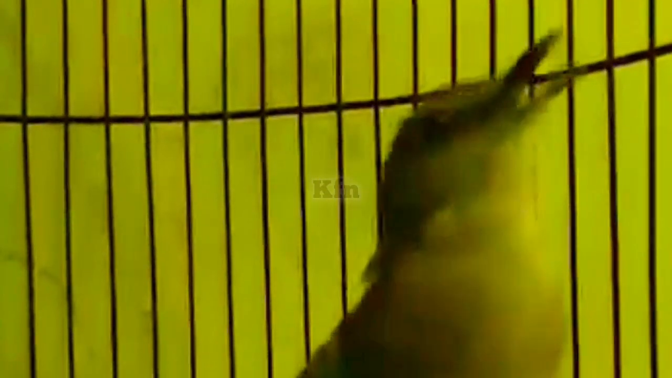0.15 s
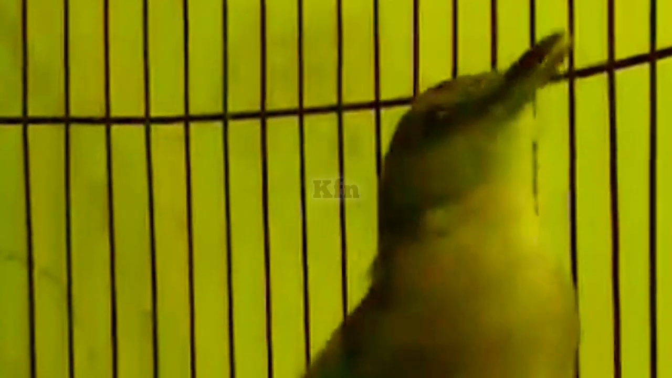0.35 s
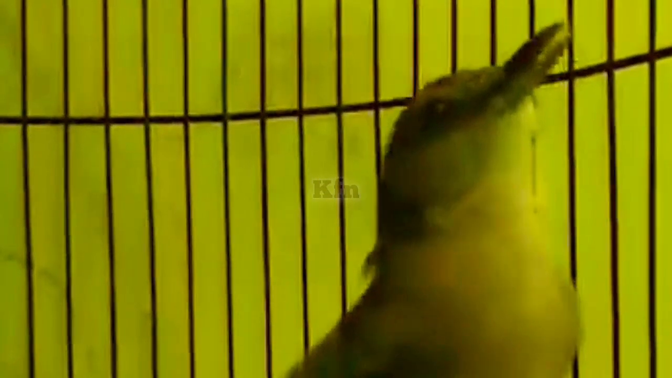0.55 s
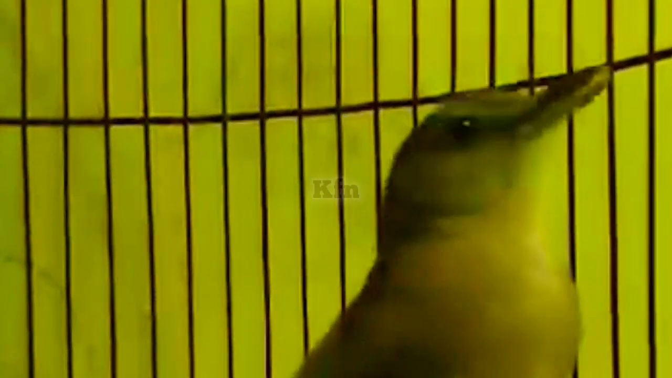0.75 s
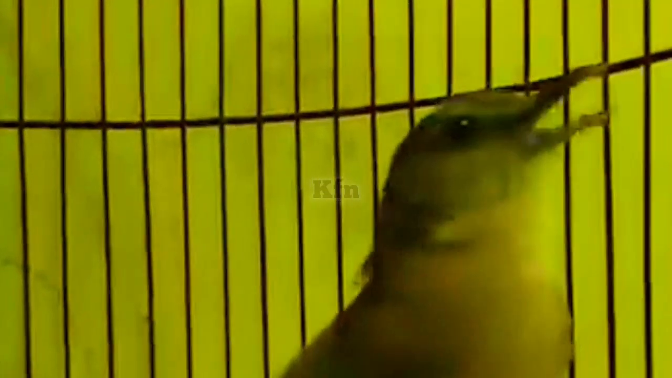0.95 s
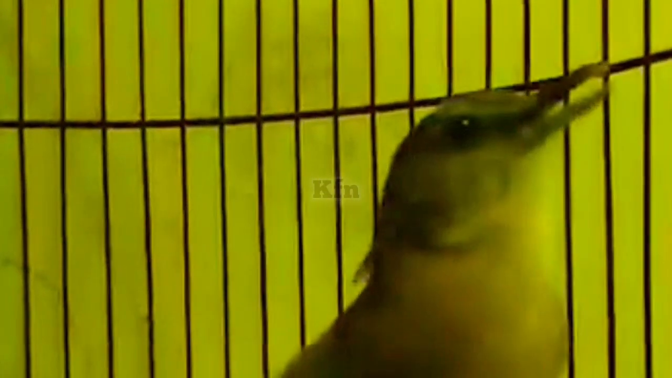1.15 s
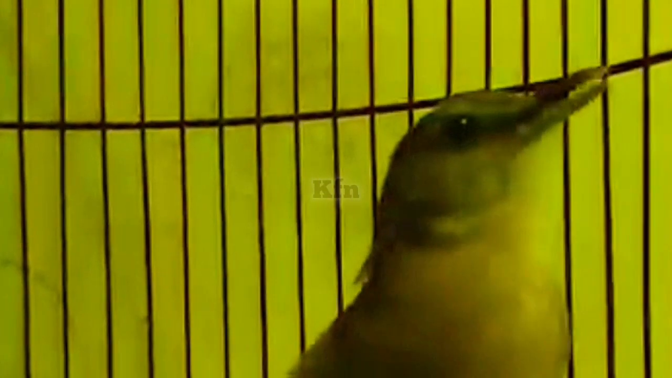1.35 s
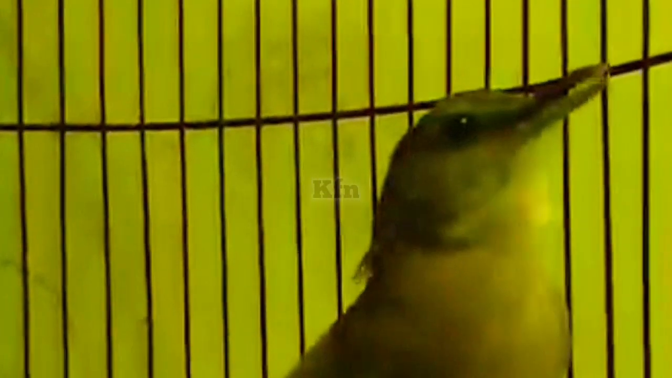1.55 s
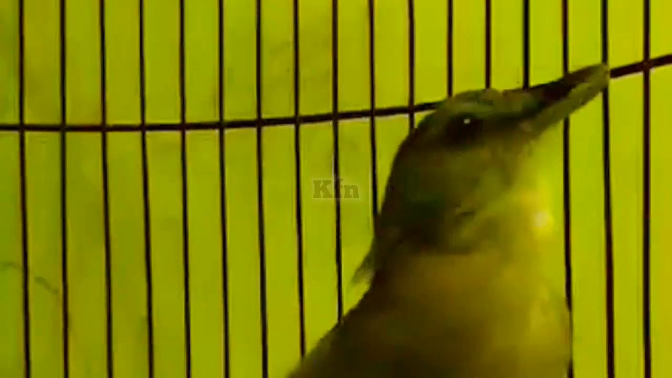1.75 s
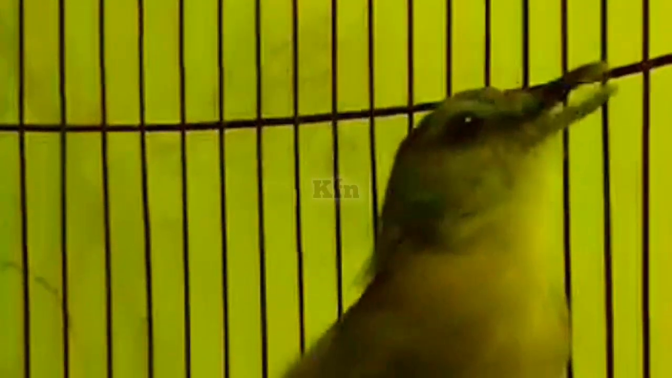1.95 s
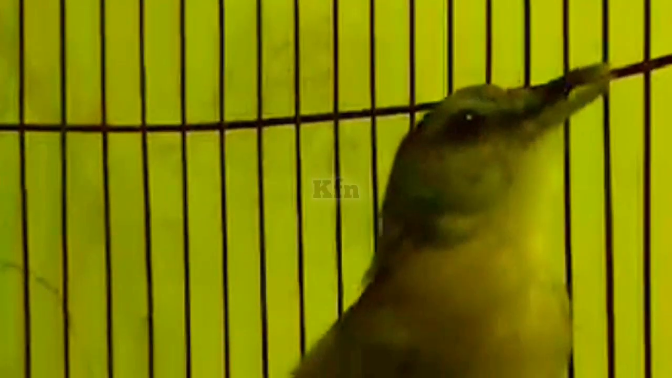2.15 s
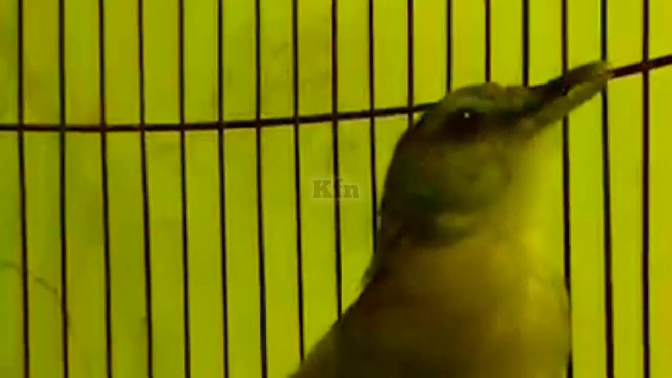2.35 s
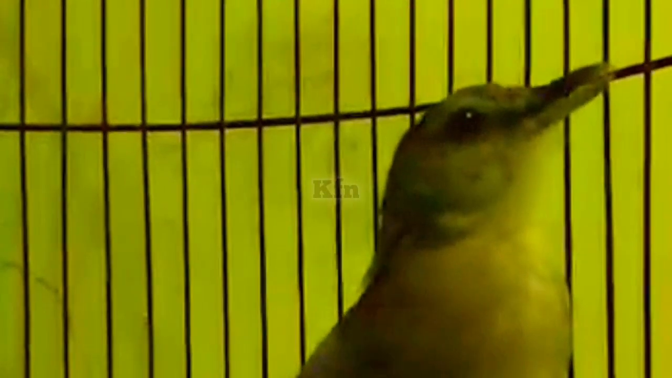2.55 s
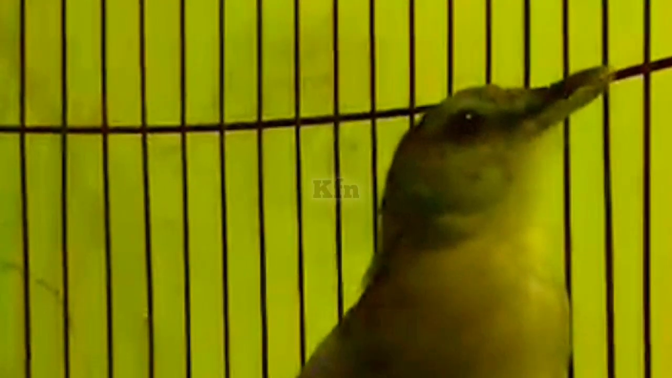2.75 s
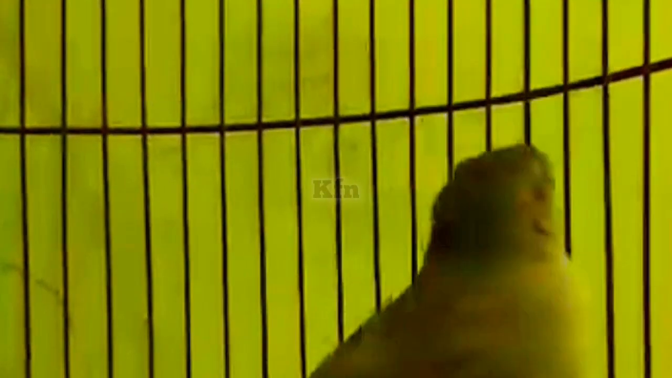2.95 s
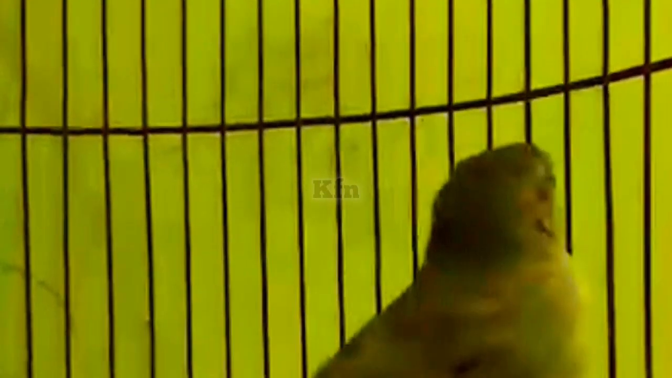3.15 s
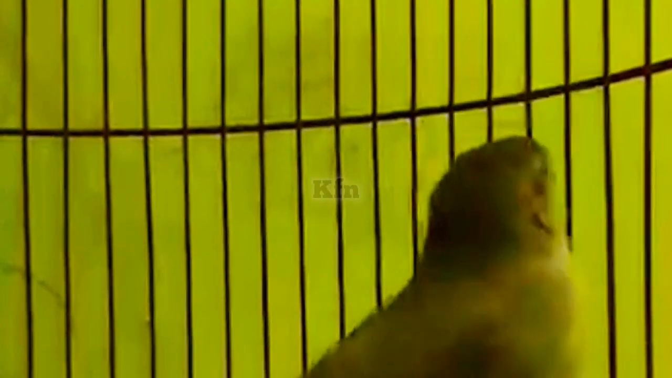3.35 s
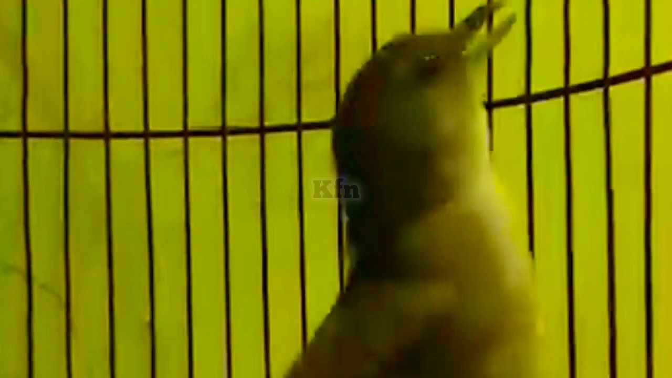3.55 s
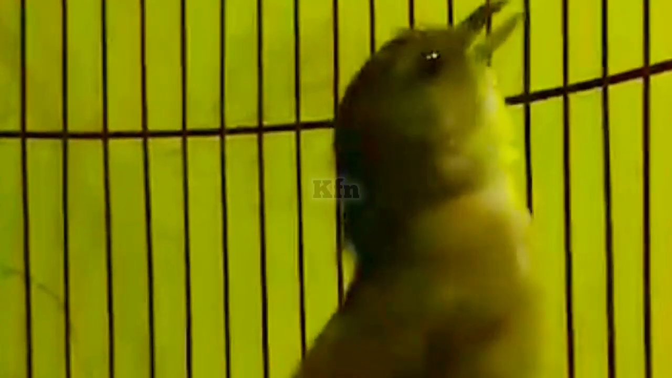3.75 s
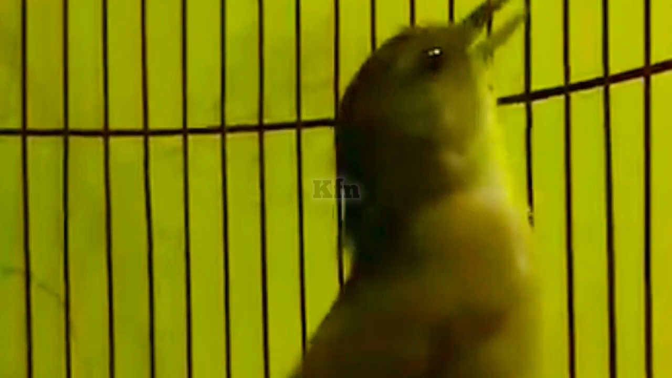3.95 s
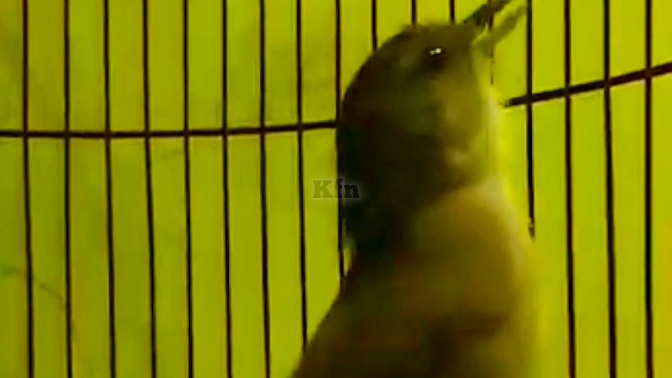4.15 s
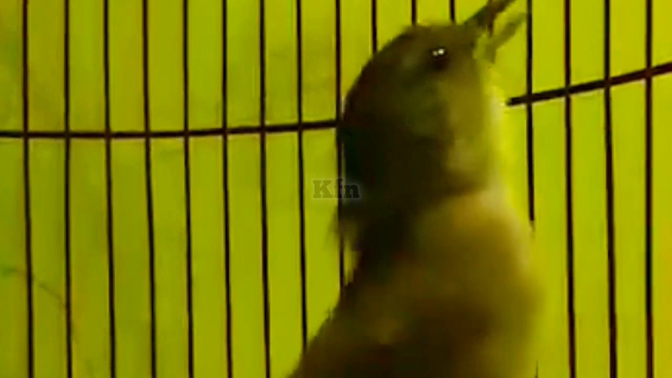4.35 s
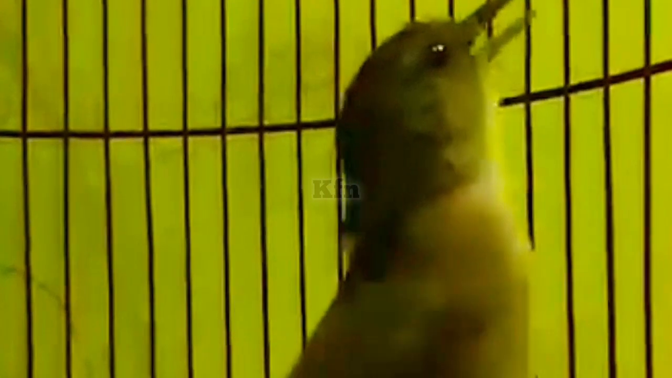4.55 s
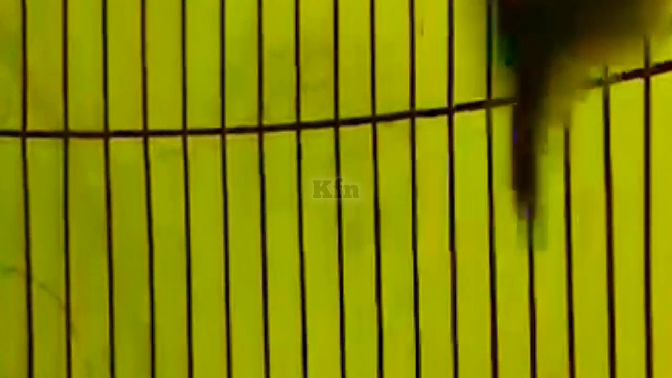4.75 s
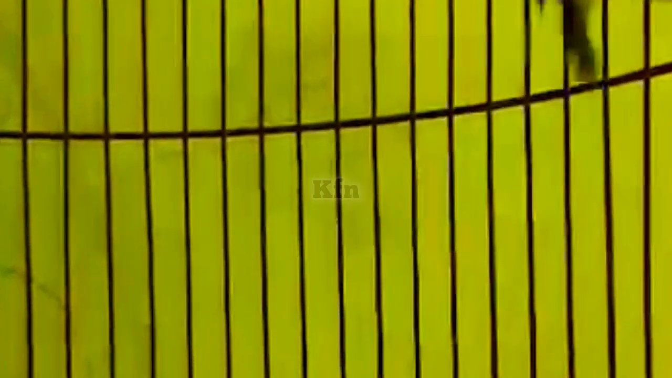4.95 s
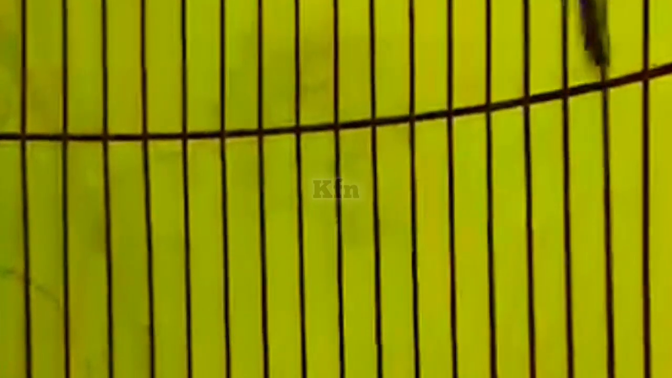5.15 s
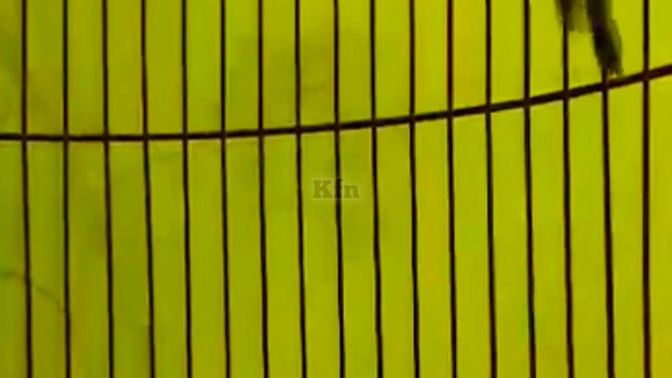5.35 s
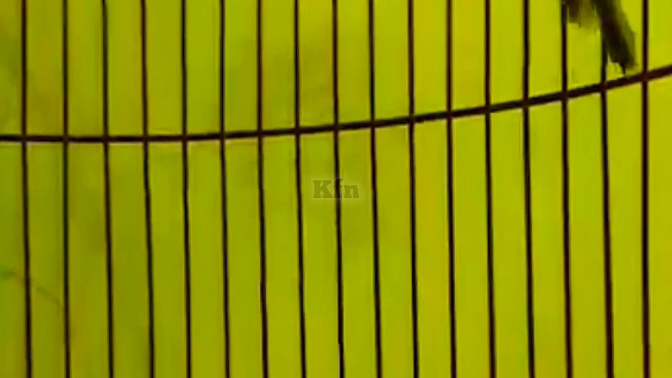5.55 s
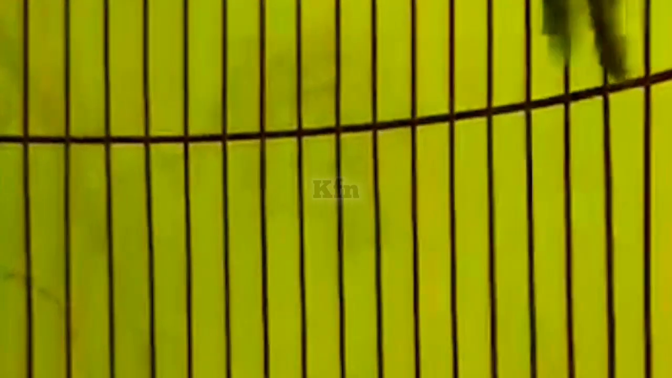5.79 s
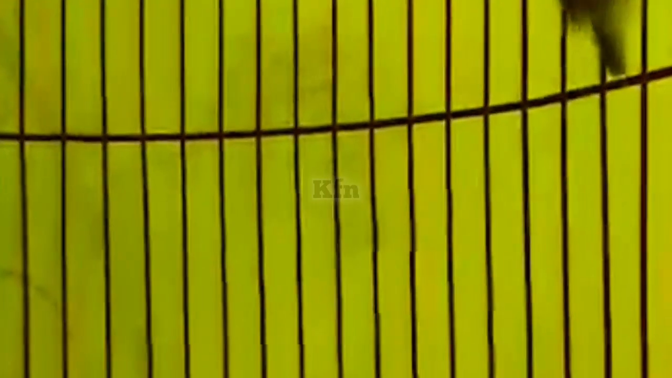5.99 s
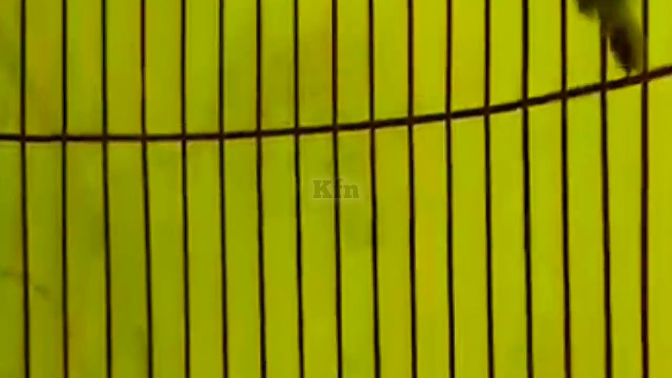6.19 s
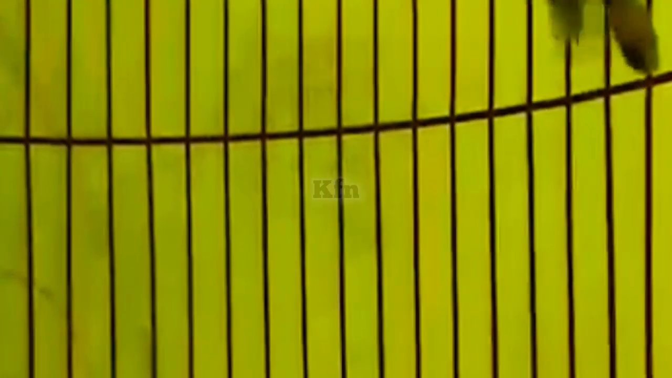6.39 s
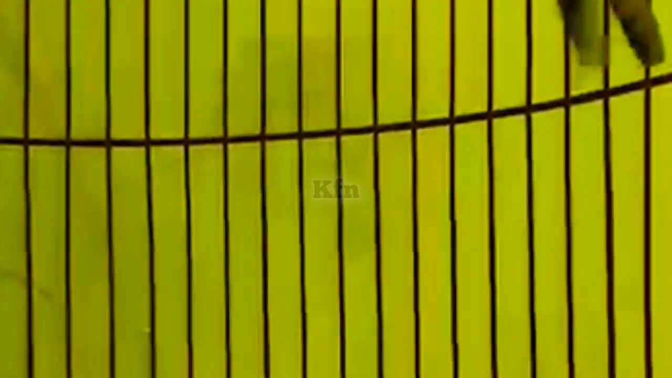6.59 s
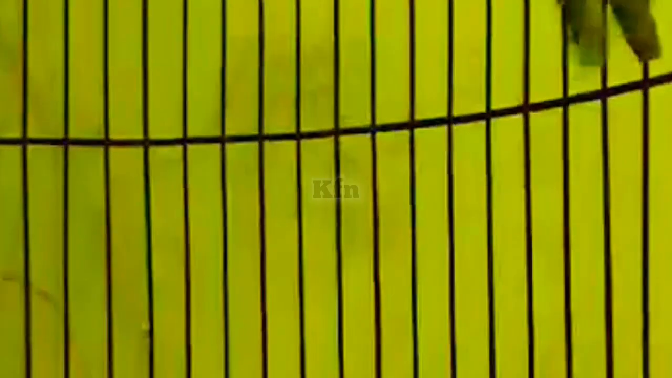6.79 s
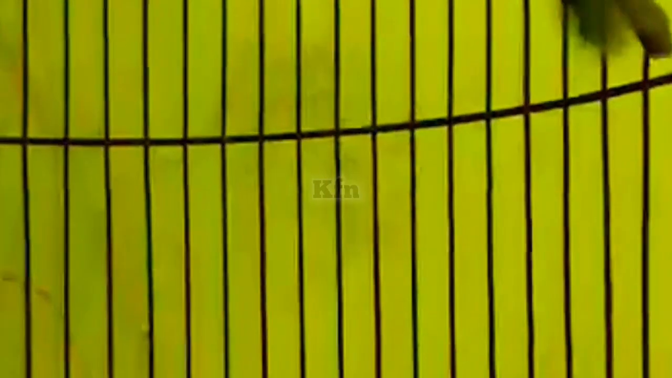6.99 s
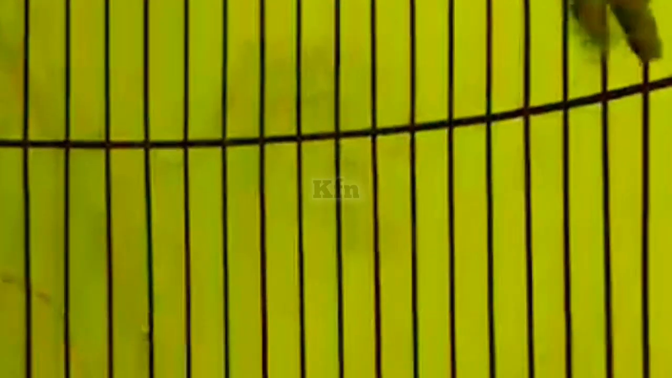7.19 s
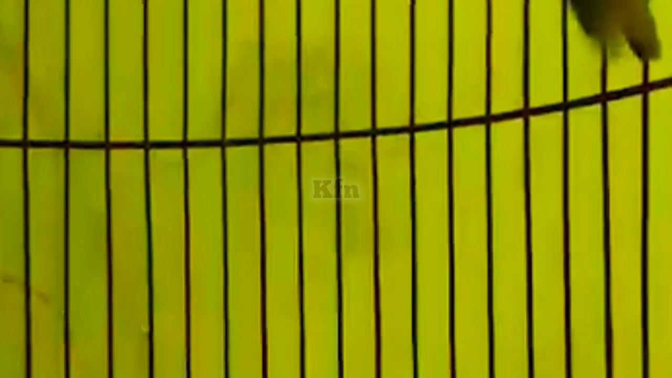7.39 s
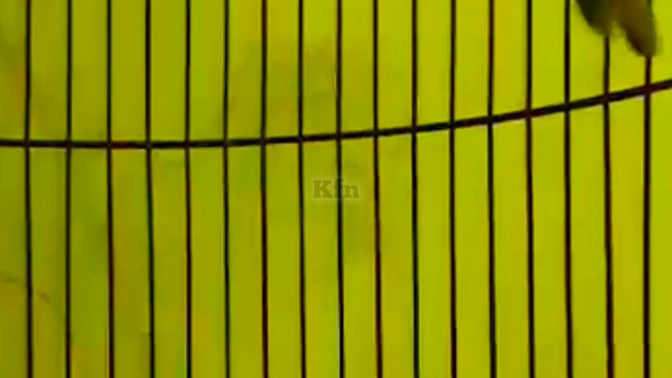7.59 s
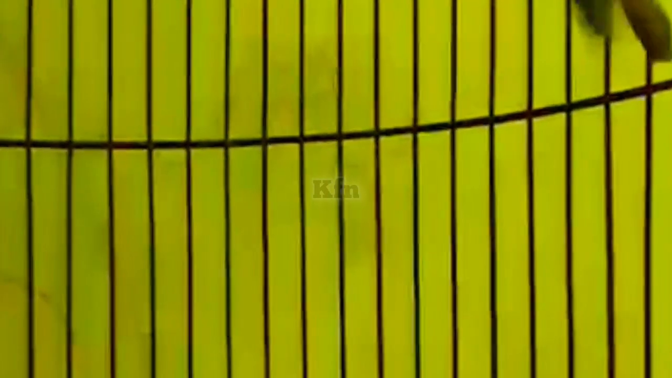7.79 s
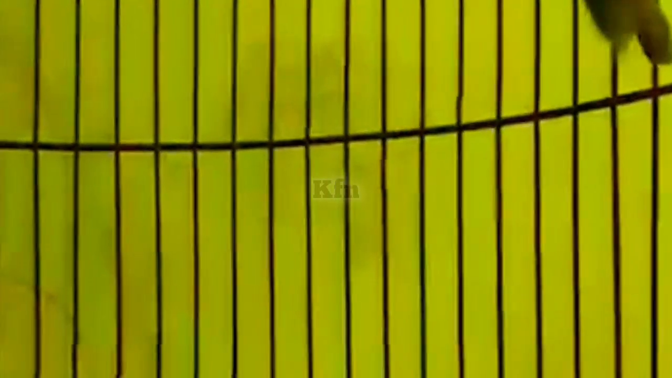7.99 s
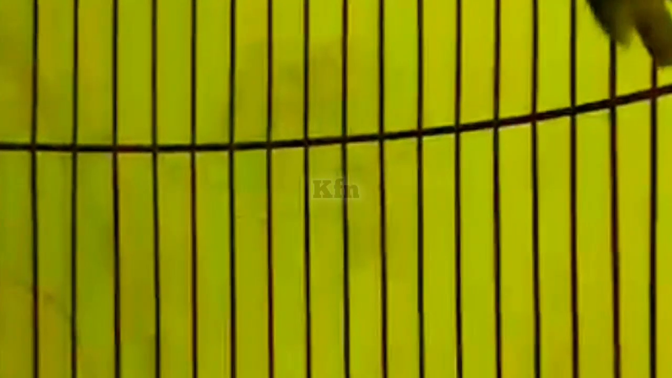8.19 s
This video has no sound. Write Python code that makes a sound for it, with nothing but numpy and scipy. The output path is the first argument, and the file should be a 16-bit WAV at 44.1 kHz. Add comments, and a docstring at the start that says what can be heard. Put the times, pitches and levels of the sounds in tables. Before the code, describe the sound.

A songbird in a wire cage whistles very close to the microphone: separate, nearly pure notes that scoop upward, waver high or swoop down, each trailing a short dense echo. Pauses between them hold soft chirps from a second bird further off. Just before five seconds it hops, scuffing and knocking the perch and making wires ring, then sings on. Faint room noise and low hum lie underneath.

```python
"""A babbler whistles loud, slurred notes in a wire cage, close to the microphone in a small hard-walled room:
nearly pure gliding tones with weak overtones and a rush of air, each hanging on as dense echoes.
Midway it hops to a higher perch: noise scuffs, and decaying modes ring in the wires and the perch.
A second bird answers softly from further off with sliding chirps that arrive largely as echo.
Behind them lie coloured room noise, a faint low hum and a rumble that follows the song."""
import sys
import numpy as np
from scipy import signal
from scipy.fft import rfft, irfft, next_fast_len
from scipy.io import wavfile
from scipy.ndimage import uniform_filter1d, minimum_filter1d, map_coordinates

SR = 44100
rng = np.random.default_rng(int(sys.argv[2]) if len(sys.argv) > 2 else 0)


def dump(signal):
    """Clip the signal to [-1, 1] and save it as 16-bit WAV at the path in sys.argv[1]."""
    limited = np.clip(np.atleast_2d(signal).T, -1, 1)
    pcm = np.round(limited * 32767).astype(np.int16)
    wavfile.write(sys.argv[1], SR, pcm)


N = 362943
T = np.arange(N) / SR


def babbler(direct_db=0, room_db=-4.0):
    """Close by, each note comes straight from the beak and hangs on in the room."""
    out = np.zeros(N)
    for sing, rows in (upslur, UPSLURS), (warble, WARBLES), (swoop, SWOOPS), (chip, CHIPS):
        for s, length, *shape in rows:
            note = sing(np.arange(0, length, 1 / SR), *shape)
            add(out, s, amp(direct_db) * note)
            add(out, s, amp(room_db) * room(note))
    return out


# whistles that sag, then climb; the first is already under way at the start:
# [start t/s, length t/s, end of sag t/s, first f/Hz before the flick, dip f/Hz, top f/Hz before the release,
#  bow of the climb, first effort/dB, last effort/dB, overtone tilt/dB per octave]
UPSLURS = [(-.06, 0.25, 0.054, 1936, 1862, 2809, .3, -8, -5.5, 5.5),
           (1.581, .403, .215, 2108, 1701, 2300, 1.91, -9, -8.5, 2.5),
           (4.222, .328, .15, 2055, 1916, 2566, 0.37, -7.5, -8, 2),
           (6.118, 0.31, 0.073, 2022, 1940, 2671, -0.67, -8, -10, 6.5)]


def upslur(t, sag_s, first_hz, dip_hz, top_hz, bow, first_db, last_db, tilt_db, ease_db=3):
    """Flicks up, sags, then climbs to its top; the bird eases off in the middle."""
    sag = (dip_hz - first_hz) * slide(t, FLICK_S, sag_s, bow=.6)
    climb = (top_hz - dip_hz) * slide(t, sag_s, t[-1] - RELEASE_S, bow)
    pitch = (first_hz + sag + climb) * flick(t, depth=.14)
    u = t / t[-1]
    effort_db = first_db + (last_db - first_db) * u - ease_db * np.sin(np.pi * u) ** 2
    return whistle(t, pitch, effort_db, tilt_db)


# high whistles that dip, move to a crest, sink to a trough and lift again:
# [start t/s, length t/s, first f/Hz, dip f/Hz, crest f/Hz, trough f/Hz, last f/Hz before the release,
#  first effort/dB, last effort/dB, overtone tilt/dB per octave]
WARBLES = [(0.95, 0.26, 2855, 2720, 3100, 2305, 2415, -4.5, -9.5, 1),
           (3.681, 0.25, 2698, 2587, 3063, 2392, 2487, -6, -7.5, -2.5),
           (5.573, .241, 3094, 2764, 2920, 2388, 2576, -2.5, -6.5, 0.5),
           (6.897, 0.21, 3083, 2597, 2588, 2221, 2362, -13, -9.5, -8)]
DIP_S, CREST_S, TROUGH_S = .045, .079, .168  # when a warble reaches each, from its start


def warble(t, first_hz, dip_hz, crest_hz, trough_hz, last_hz, first_db, last_db, tilt_db, ease_db=6):
    """Dips, moves to a crest, sinks to a trough while the push slackens, and lifts again."""
    dip = (dip_hz - first_hz) * slide(t, 0, DIP_S, bow=0.55)
    crest = (crest_hz - dip_hz) * slide(t, DIP_S, CREST_S, bow=.6)
    trough = (trough_hz - crest_hz) * slide(t, CREST_S, TROUGH_S, bow=.65)
    lift = (last_hz - trough_hz) * slide(t, TROUGH_S, t[-1] - RELEASE_S)
    slack = np.sin(np.pi * slide(t, CREST_S, t[-1], bow=0.36)) ** 2
    effort_db = first_db + (last_db - first_db) * t / t[-1] - ease_db * slack
    return whistle(t, first_hz + dip + crest + trough + lift, effort_db, tilt_db)


# whistles that swoop down:
# [start t/s, length t/s, top f/Hz, f/Hz the fall heads for, effort/dB, overtone tilt/dB per octave]
SWOOPS = [(0.492, 0.1063, 2285, 1624, -12.5, 1), (5.223, 0.13, 2278, 1396, -12, -1),
          (7.794, 0.13, 2240, 1549, -17, -11.5)]
SWOOP_S = .09  # time a swoop takes to fall


def swoop(t, top_hz, last_hz, db, tilt_db, depth=0.1, swell_db=7):
    """Flicks up as it swells, then falls in an S-curve."""
    fall = np.sin(np.pi / 2 * slide(t, FLICK_S, FLICK_S + SWOOP_S)) ** 2
    pitch = (top_hz + (last_hz - top_hz) * fall) * flick(t, depth)
    effort_db = db - swell_db * (1 - slide(t, 0, FLICK_S))
    return whistle(t, pitch, effort_db, tilt_db, overtone_db=1.5)


# short falling chips:
# [start t/s, length t/s, first f/Hz, f/Hz the fall heads for, effort/dB, overtone tilt/dB per octave]
CHIPS = [(3.388, .069, 2330, 1969, -16, -13.5), (3.457, .054, 2449, 1888, -12, -13),
         (8.114, 0.037, 3105, 2187, -25.5, -13)]
CHIP_S = .016  # time constant of a chip's fall


def chip(t, first_hz, last_hz, db, tilt_db):
    """Falls at once and levels out, with faint overtones."""
    pitch = last_hz + (first_hz - last_hz) * np.exp(-t / CHIP_S)
    return whistle(t, pitch, db, tilt_db, overtone_db=-5.0)


FLICK_S = .019  # time a low note takes to flick up to its pitch


def flick(t, depth):
    """Pitch factor of the quick rise that opens a low note, from this share below."""
    return 1 - depth * (1 - slide(t, 0, FLICK_S, bow=1))


# what throat and beak let through of an overtone, before tilt: [f/Hz, level/dB re the fundamental]
THROAT = [(2800, -1), (3400, -9.5), (4000, -34), (4700, -35.5), (5800, -30), (7300, -43), (8100, -49),
          (8900, -58.5), (9800, -52), (11500, -61.5), (13000, -55), (14800, -50.5)]
# the throat is tuned to the high notes, so low ones come out weaker: [pitch f/Hz, level/dB]
CARRY = [(1350, -12.5), (1700, -6), (1980, 1.5), (2250, 1.5), (2550, -1.5), (2850, -2.5), (3150, 3.5)]
# colour of the rush of air through the open beak: [f/Hz, relative level/dB]
AIR = [(3000, -43), (7000, -20), (8800, -15), (10000, 1.5), (11500, -13.5), (13000, -10.5), (14800, 0)]
ATTACK_S, ATTACK_DB = 0.021, 12  # every note swells from this far down
RELEASE_S, RELEASE_DB, RELEASE_DROP = .015, 19, 0.21  # at the end level falls, pitch drops by this share
# the beak opens over this pitch range; half shut it dulls the overtones, by up to this much an octave
GAPE_HZ, GAPE_TILT_DB = (1920, 2470), 7.5


def whistle(t, pitch, effort_db, tilt_db, flutter_db=3.0, brighten=0.13, overtone_db=0,
            wander=.008, glide_s=0.0029, rough=0.05, air_db=-54.0):
    """The syrinx sings a nearly pure tone; rough overtones and air grow with the push and the open beak."""
    closing = slide(t, t[-1] - RELEASE_S, t[-1], bow=-0.94)
    pitch = uniform_filter1d(pitch, max(int(glide_s * SR), 1))
    swell_db = -ATTACK_DB * (1 - slide(t, 0, ATTACK_S, bow=0.51))
    level = effort_db + along(CARRY, pitch) + swell_db - RELEASE_DB * closing
    shut = 1 - slide(pitch, *GAPE_HZ)
    pitch = pitch * (1 - RELEASE_DROP * closing) * (1 + wander * wobble(t, 45.24))
    waver = .003 * wobble(t, 90) + .004 * wobble(t, 500)
    phase = 2 * np.pi * np.cumsum(pitch * (1 + waver)) / SR
    # per octave above the first overtone; a harder push is brighter
    slope_db = tilt_db + brighten * (level + 8.0) - GAPE_TILT_DB * shut
    air = amp(air_db + slope_db - GAPE_TILT_DB * shut) * noise(AIR)[:len(t)]
    tone = np.sin(phase) + air
    for k in range(2, 9):
        uneven_db = 3.5 * wobble(t, 200) + 1.5 * wobble(t, 25)
        db = along(THROAT, k * pitch) + overtone_db + slope_db * np.log2(k / 2) + uneven_db
        audible = k * pitch < SR / 2
        tone = tone + amp(db) * audible * np.sin(k * (phase + rough * wobble(t, 1100)))
    return tone * soft_gate(t) * amp(level + flutter_db * wobble(t, 120))


# how long the small hard-walled room rings: [f/Hz, time to fall 60 dB t/s]
ROOM = [(300, 0.95), (1500, 0.38), (2500, 0.58), (4000, 0.43), (7000, 0.4), (10000, 0.44), (15000, 0.38)]


def room(x, gap=0.0029, build=0.0041):
    """Dense echoes of energy 1 that arrive after a short gap; each frequency dies at its own speed."""
    hz, t, z = signal.stft(rng.standard_normal(SR), SR, nperseg=256)
    decay = amp(-60 * t / along(ROOM, hz)[:, None])
    tail = signal.istft(z * decay, SR, nperseg=256)[1][:SR]
    tail = tail * np.clip((np.arange(SR) / SR - gap) / build, 0, 1)
    return signal.fftconvolve(x, tail / np.linalg.norm(tail))


# feet and wings against the cage: [t/s, scuff level/dB, wire ring level/dB, perch knock level/dB]
HOPS = [(4.752, -42.5, -65.5, -26.5), (4.824, -39, -59.5, -33), (4.841, -29, -46.5, -56.5),
        (4.970, -32, -46, -40.5), (4.987, -31.5, -40, -44), (5.149, -49.5, -71, -63.5)]
# colour of the scuffs: [f/Hz, relative level/dB]
SCUFF = [(200, -19), (500, 2.5), (750, -3.5), (1200, 9), (1900, 6), (3500, 0), (6000, -10.5), (8500, -21.5),
         (10000, -17.5), (12000, -29), (15000, -30.5)]
# ringing modes of the wires: [f/Hz, width f/Hz, relative level/dB, time to fall 60 dB t/s]
WIRES = [(433, 53, -15, 4.9), (534, 110, -9.5, 1.3), (1111, 96, -7, 2.7), (1360, 160, -17, 4.5),
         (1670, 100, -8.5, 0.54), (2090, 150, 7, 0.77), (3660, 250, 2, 0.83), (5410, 170, 4, 0.7),
         (7623, 300, -4.5, 0.39), (9280, 420, -38.5, 0.49)]
# ringing modes of the perch: [f/Hz, width f/Hz, relative level/dB, time to fall 60 dB t/s]
PERCH = [(767, 91, -21.5, 0.34), (932, 62, -6.5, 0.1), (1090, 140, -20, 0.22), (1570, 59, 1, 0.21),
         (2116, 140, -3, 0.073), (3620, 1100, -15.5, 0.38)]
# hum of the shaken cage, before it wavers: [t/s, f/Hz, level/dB]
FRAME = [(4.99, 355, -51), (5.035, 344, -39.5), (5.07, 306, -47), (5.10, 317, -37), (5.125, 331.6, -68),
         (5.18, 325, -57.5), (5.55, 336, -62.5)]


def cage(attack=0.0008, chatter_db=5.0, room_db=-3):
    """Claws scuff the bars, knock the perch and set the wires ringing; the frame hums after the landing."""
    out, t = np.zeros(N), np.arange(2 * SR) / SR
    fade = amp(-60 * t / .17)
    onset = 1 - np.exp(-t / attack)
    for s, scuff_db, wire_db, knock_db in HOPS:
        chatter = unit(amp(chatter_db * wobble(t, 230)))  # loose bars rattle unevenly in their holes
        scuff = amp(scuff_db) * fade * chatter * noise(SCUFF)[:len(t)]
        wires = amp(wire_db) * ring(WIRES, t)
        knock = amp(knock_db) * ring(PERCH, t)
        add(out, s, (scuff + wires + knock) * onset)
    t, pitch, level, gate = glide(FRAME)
    phase = 2 * np.pi * np.cumsum(pitch * (1 + 0.018 * wobble(t, 70))) / SR
    add(out, t[0], gate * amp(level + 6.9 * wobble(t, 60)) * np.sin(phase))
    return out + amp(room_db) * room(out)[:N]


def ring(modes, t):
    """Struck modes; many nearly alike bars make each one a narrow, beating cluster."""
    total = 0
    for hz, width, db, t60 in modes:
        beating = wobble(t, width) + 1j * wobble(t, width)
        cluster = np.real(beating * np.exp(2j * np.pi * hz * t)) / np.sqrt(2)
        total = total + amp(db - 60 * t / t60) * cluster
    return total


def glide(rows, smooth=0.011):
    """Times, pitch and level of a gliding tone with rounded corners, and its gate."""
    s, hz, db = np.transpose(rows)
    t = np.arange(s[0], s[-1], 1 / SR)
    width = max(int(smooth * SR), 1)
    pitch, level = (uniform_filter1d(np.interp(t, s, v), width) for v in (hz, db))
    return t, pitch, level, soft_gate(t)


# chirps from further off, before they waver and reach the room:
# [start t/s, length t/s, first f/Hz, last f/Hz, level/dB]
ANSWERS = [(0.847, 0.066, 2205, 1444, -45), (2.172, 0.015, 2810, 2660, -36.5),
           (2.406, 0.067, 2326, 1742, -37), (2.673, 0.065, 2430, 1660, -38.5),
           (2.719, .04, 1670, 2516, -38), (2.91, 0.048, 2430, 1664, -36), (6.004, 0.07, 1613, 1425, -47.5),
           (7.482, 0.052, 1806, 1255, -55), (7.558, 0.019, 2030, 1800, -40), (8.048, 0.05, 2127, 1660, -32)]


def far_bird(direct_db=-3, room_db=-2, second_db=-28):
    """Soft chirps from further off slide, level out, and arrive largely as echo."""
    out = np.zeros(N)
    for s, length, first_hz, last_hz, db in ANSWERS:
        u = np.linspace(0, 1, int(length * SR))
        pitch = last_hz + (first_hz - last_hz) * (1 - u) ** 2.4
        pitch = pitch * (1 + .012 * wobble(u * length, 300))
        phase = 2 * np.pi * np.cumsum(pitch) / SR
        swell = np.sqrt(np.abs(np.sin(np.pi * u)))
        chirp = amp(db) * swell * (np.sin(phase) + amp(second_db) * np.sin(2 * phase))
        add(out, s, amp(direct_db) * chirp)
        add(out, s, amp(room_db) * room(chirp))
    return out


# colour of the rumble: [f/Hz, relative level/dB]
RUMBLE = [(20, -1.5), (60, 4.5), (110, -5), (220, -7.5), (400, -19), (900, -42.5)]


def rumble(song, rumble_db=-38):
    """A faint low rumble swells with the power of the loudest notes."""
    power = uniform_filter1d(song ** 2, SR // 20)
    return amp(rumble_db) * power * noise(RUMBLE)


# colour of the room noise: [f/Hz, relative level/dB per Hz]
AMBIENCE = [(25, -25), (60, -16.5), (100, -19.5), (180, -11.5), (380, -15.5), (540, -11.5), (750, -24),
            (1500, -17), (2430, 0.5), (2750, -17.5), (3600, -16.5), (4300, -32), (5400, -24.5),
            (8500, -50.5)]
# how the room noise swells and sinks, before it wavers: [t/s, level/dB]
FLOOR = [(0, -48.5), (.8, -54.5), (2.2, -51.5), (3.1, -55), (3.6, -41), (4.1, -53), (5.5, -48),
         (6.7, -56.5), (7.6, -56.5), (7.68, -49.5), (8.23, -47)]


def background(hum_hz=70, hum_db=-19, hiss_db=-92):
    """Faint room noise with a low wavering hum, swelling and sinking together over a trace of hiss."""
    hum = (1 + .6 * wobble(T, 9)) * np.sin(2 * np.pi * hum_hz * T + wobble(T, 12))
    level = amp(np.interp(T, *np.transpose(FLOOR)) + 1.3 * wobble(T, 6.8))
    hiss = amp(hiss_db) * rng.standard_normal(N)
    return level * (noise(AMBIENCE) + amp(hum_db) * hum) + hiss


def amp(db):
    """Decibels to gain."""
    return 10 ** (np.asarray(db) / 20)


def unit(x):
    """x at rms 1."""
    return x / np.sqrt(np.mean(x ** 2) + 1e-20)


def along(points, hz):
    """(Hz, value) points read on a log axis."""
    f, v = np.transpose(points)
    return np.interp(np.log(hz + 1), np.log(f + 1), v)


def filtered(x, response):
    """x times a response of frequency."""
    m = next_fast_len(N + SR // 2)
    return irfft(rfft(x, m) * response(np.fft.rfftfreq(m, 1 / SR)), m)[:N]


def noise(spectrum):
    """Coloured noise of rms 1."""
    return unit(filtered(rng.standard_normal(N), lambda hz: amp(along(spectrum, hz))))


def wobble(t, rate):
    """A smooth random curve over the times t, rate knots a second."""
    return map_coordinates(rng.standard_normal(4096), [t * rate], mode="wrap")


def slide(t, start, end, bow=0):
    """Goes from 0 to 1 between two values of t; a positive bow moves early, a negative one late."""
    u = np.clip((t - start) / (end - start), 0, 1)
    return u + bow * u * (1 - u)


def soft_gate(t):
    """Opens and closes a sound over 4 ms, without a click."""
    opening = np.clip(np.minimum(t - t[0], t[-1] - t) / .004, 0, 1)
    return np.sin(np.pi / 2 * opening) ** 2


def add(track, s, x):
    """Mix x into the track from time s on; s may lie before the start."""
    i = round(s * SR)
    x, i = x[max(-i, 0):], max(i, 0)
    track[i:i + len(x)] += x[:max(N - i, 0)]


def scene():
    """Both birds, the cage and the room."""
    song = babbler()
    return (song + rumble(song) + far_bird() + cage() + background())[None]


# resonances of the microphone port: [f/Hz, width f/Hz, level/dB re the direct sound]
PORT = [(9790, 350, 15.5), (14700, 700, 4.5)]
TOP_HZ = 15800  # band limit


def record(dry):
    """The microphone port rings in the treble; a limiter holds the loudest notes; a band limit cuts the top."""
    def port(f):
        """Direct sound plus the port's resonances."""
        response = 1
        for hz, width, db in PORT:
            response = response + amp(db) * 1j * f * width / (hz ** 2 - f ** 2 + 1j * f * width)
        return response

    x = filtered(dry[0], port)
    hold = SR // 200  # 5 ms
    needed = 1 / np.maximum(np.abs(x), 1)
    gain = uniform_filter1d(minimum_filter1d(needed, 2 * hold), hold)
    return filtered(x * gain, lambda hz: hz < TOP_HZ)[None]


dry = scene()
out = record(dry)
dump(out)
```